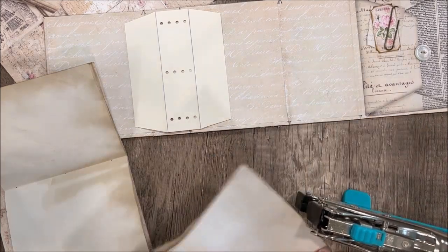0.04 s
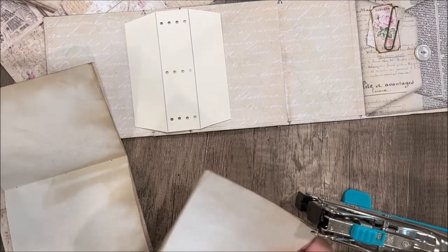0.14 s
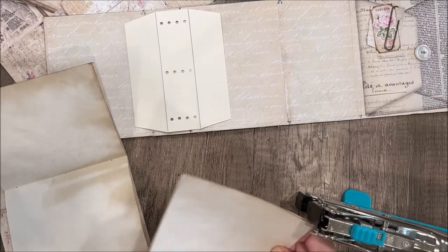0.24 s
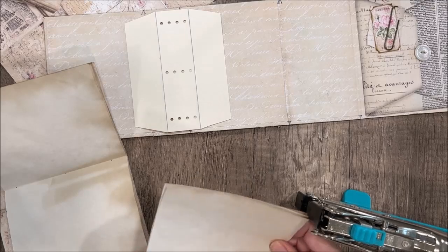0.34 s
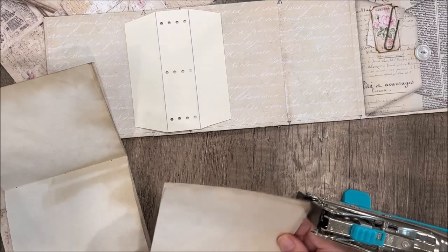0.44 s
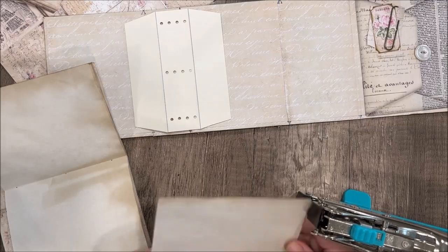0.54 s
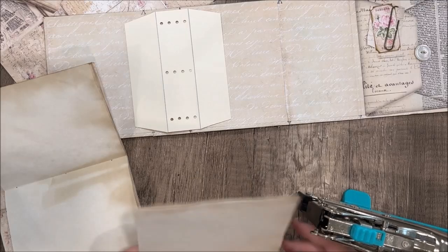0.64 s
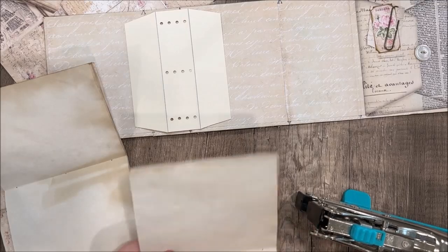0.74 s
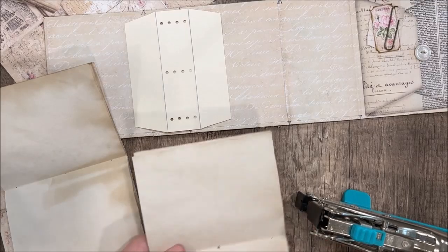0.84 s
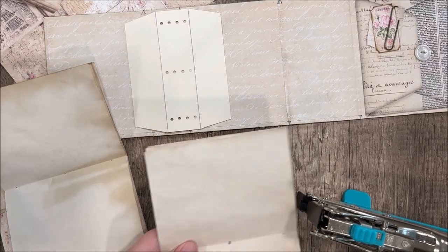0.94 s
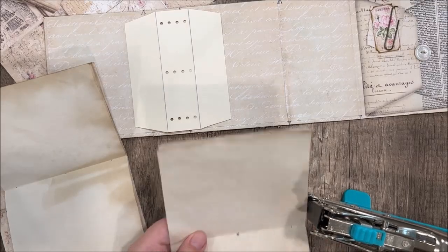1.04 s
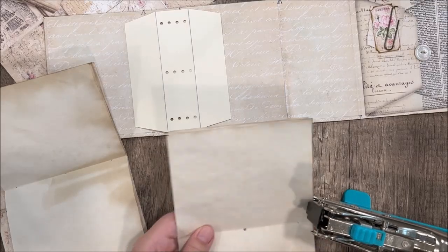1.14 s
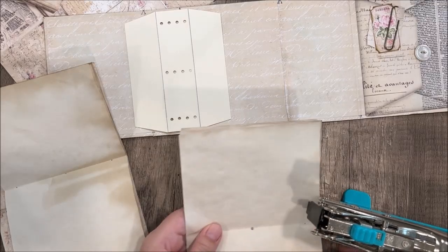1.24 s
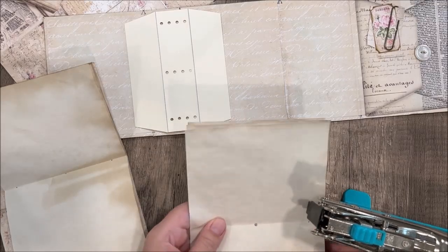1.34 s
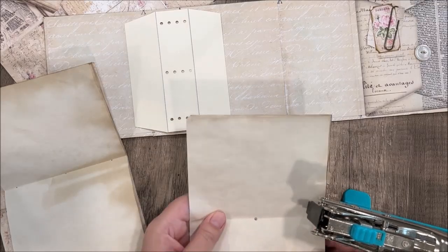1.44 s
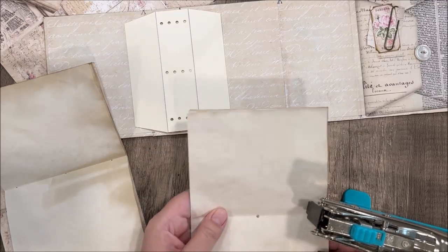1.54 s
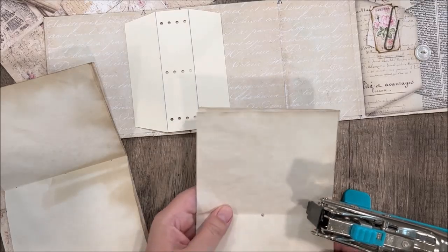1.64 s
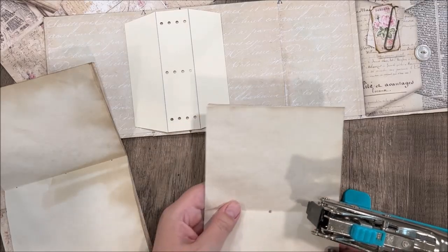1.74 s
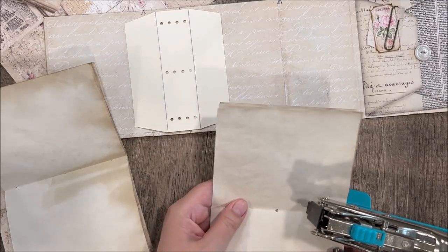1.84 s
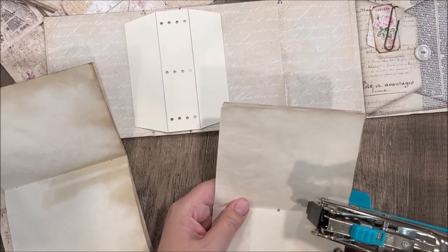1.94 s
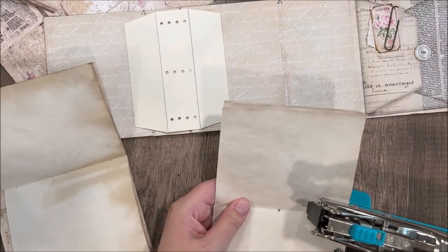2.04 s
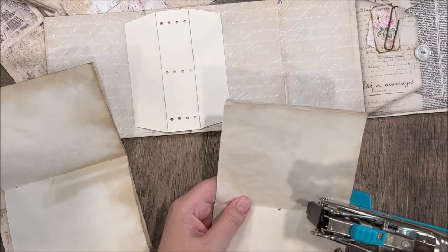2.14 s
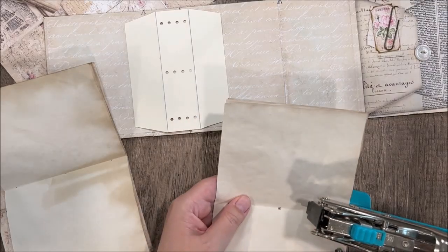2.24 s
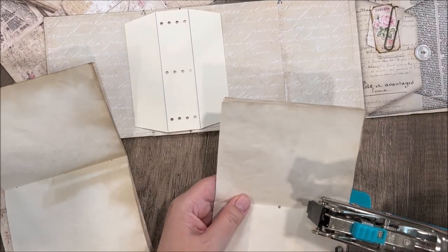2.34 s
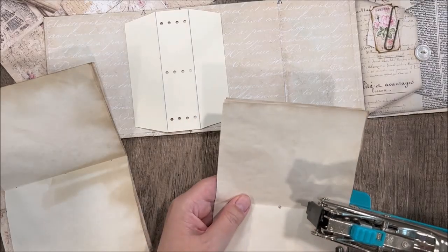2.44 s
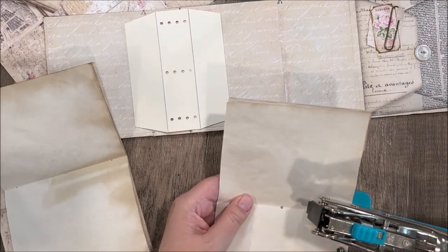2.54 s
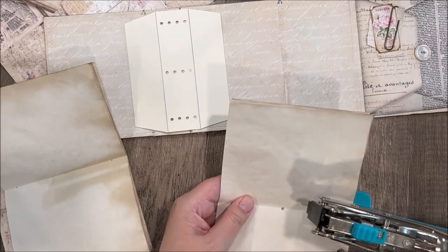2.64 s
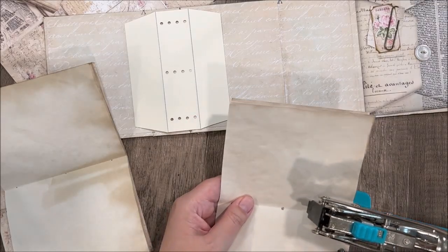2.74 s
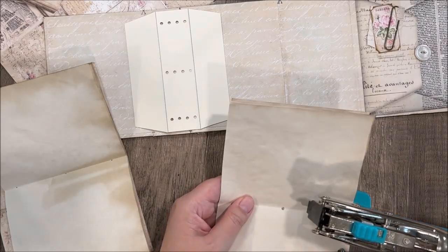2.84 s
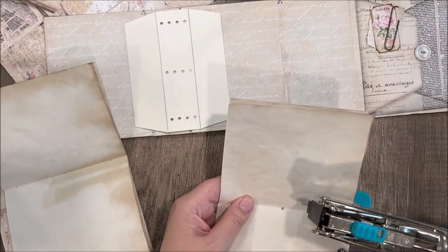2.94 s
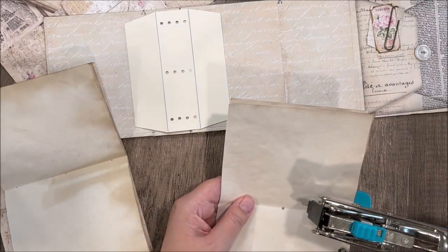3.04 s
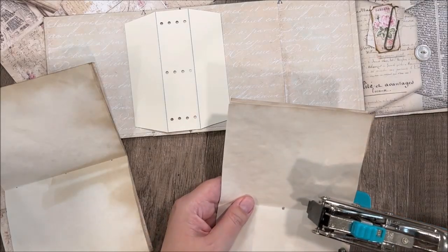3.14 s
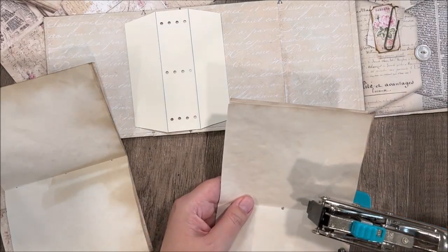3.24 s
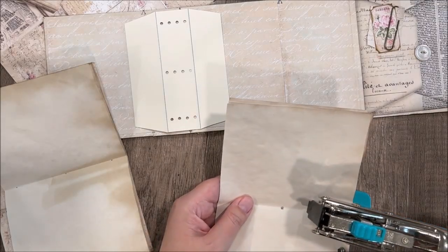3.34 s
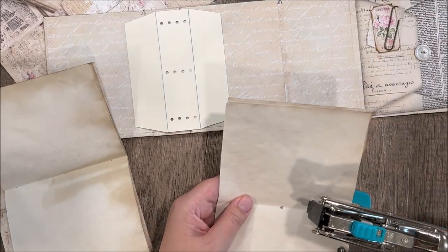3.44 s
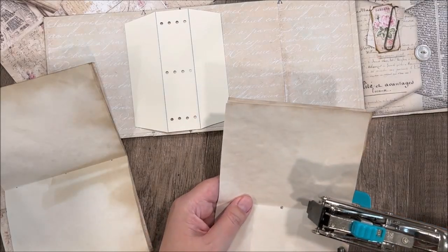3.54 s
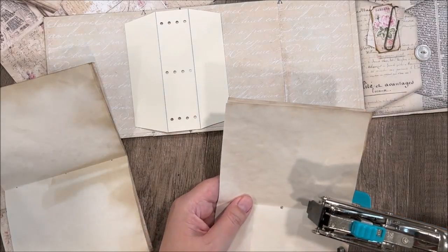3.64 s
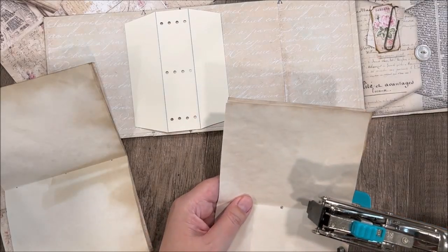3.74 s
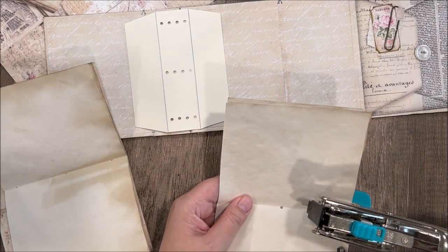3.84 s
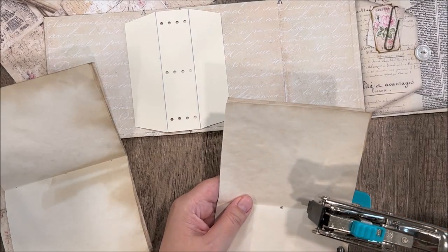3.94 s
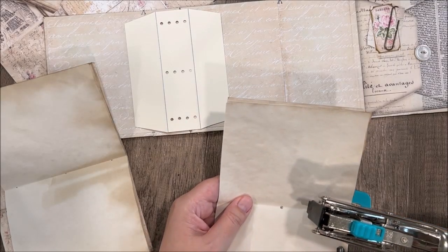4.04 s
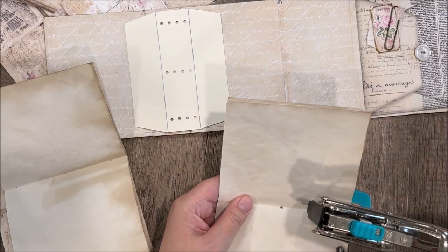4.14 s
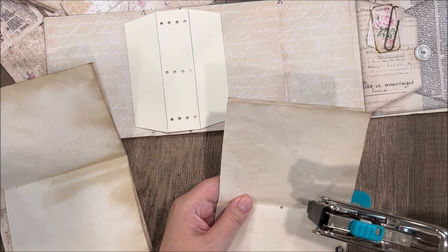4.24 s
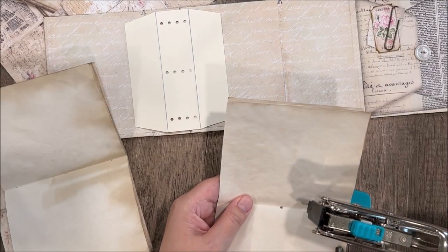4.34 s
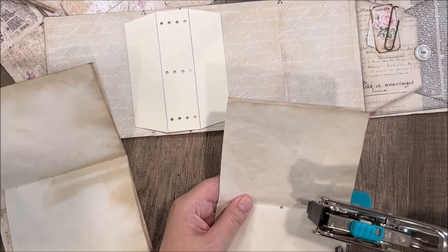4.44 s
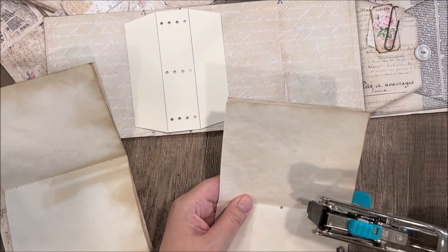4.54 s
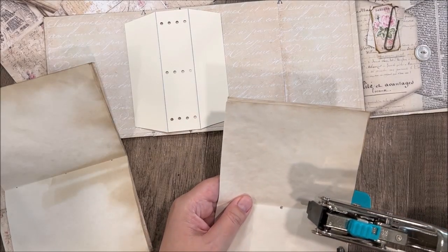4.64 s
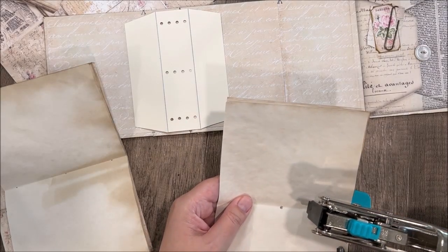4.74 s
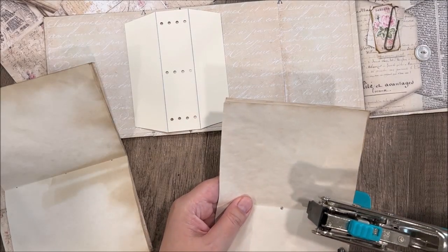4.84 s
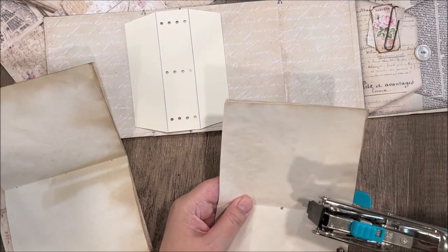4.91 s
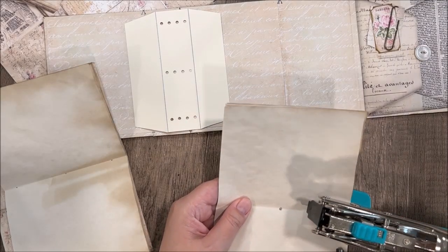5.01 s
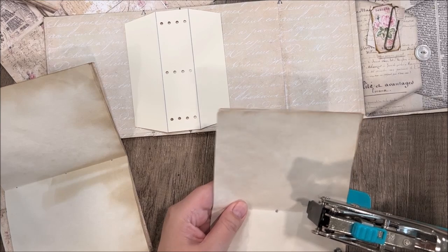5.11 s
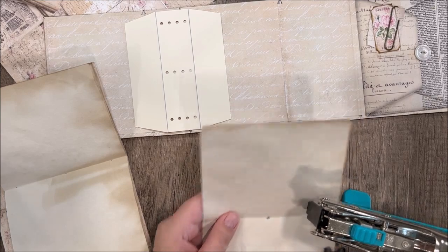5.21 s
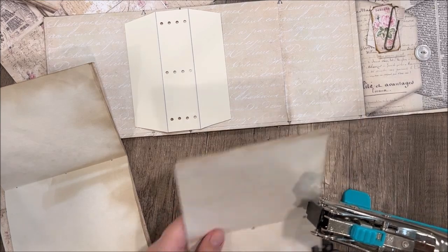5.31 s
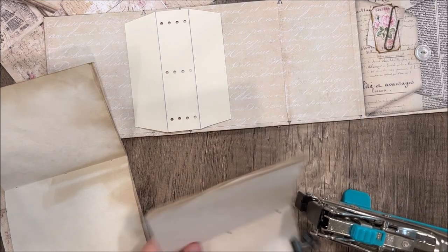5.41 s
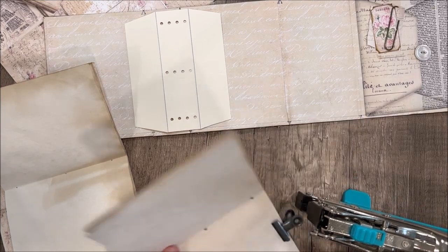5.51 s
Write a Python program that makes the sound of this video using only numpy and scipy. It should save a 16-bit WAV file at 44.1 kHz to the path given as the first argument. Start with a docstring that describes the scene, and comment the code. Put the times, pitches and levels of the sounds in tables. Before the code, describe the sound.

From the start, a folded sheet of paper slides and flexes in the hand, close to the microphone, with soft hiss and scattered little pops. The sharpest crinkle comes at about 1.2 seconds, with a faint squeak at 1.4 and lighter crackles until 1.9. It then goes quiet, apart from two light clicks and knocks of a steel hand punch on a wooden table around 2.7 to 2.8. At 4.4 the punch ticks and creaks faintly. At about 4.6 it bites through the paper with the loudest sound, a quick cluster of sharp, briefly ringing metal clacks and a papery scrape. It releases with clicks and thin, high squeaks near 4.95. The sheet tears free in a short crackle around 5.1, followed by soft table knocks and light rustling until 5.6. A faint low hum and dull rumble lie underneath, with short room reflections.

```python
"""A steel hand punch bites through folded paper over a wooden craft table, close under a phone's two mics.
Each blow cracks, rings the steel and thumps the table; rubbing makes hinge, spring and sheet squeak.
Just as near, the paper hisses as it slides, snaps as it buckles and tears free of the die.
Behind them are short room reflections, a soft low hum, a dull rumble and diffuse room noise."""
import sys
import numpy as np
from scipy import signal
from scipy.fft import rfft, irfft, next_fast_len
from scipy.io import wavfile

SR = 44100
rng = np.random.default_rng(int(sys.argv[2]) if len(sys.argv) > 2 else 0)


def output_pcm(signal):
    """Save a mono or channel-first signal as 16-bit PCM at the path in sys.argv[1].

    Samples are clipped to [-1, 1] before scaling.
    """
    pcm = np.clip(np.atleast_2d(signal).T, -1, 1) * 32767
    wavfile.write(sys.argv[1], SR, np.round(pcm).astype(np.int16))


N = 245637

# blows on the punch, close to the mics: (time [s], die level [dB], then relative to the die:
# jaws [dB], handles [dB], table [dB], crack of contact [dB])
BLOWS = [(2.6925, -58, -2, -8, -4.5, 9), (2.6970, -77.5, -5, 22, 10.5, 0), (2.7956, -70.5, -4, 22, 12, 7),
         (2.814, -62, -10, -8, 0, 19.5), (4.399, -42, -10.5, -8.5, -60.5, -5),
         (4.59, -42, -12.5, -15, 2.5, -2), (4.6304, -21, -9.5, -11.5, -35, -7),
         (4.6353, -13, -24, -27.5, -9.5, -5.5), (4.646, -29, -41, -26, 7, -10),
         (4.6582, -13.5, -16.5, -26, -21, -14), (4.6721, -26.5, -3.5, -13.5, -43.5, -16),
         (4.6790, -24, -11.5, -24, -12.5, -16), (4.698, -36, -11.5, -12, -6, -11),
         (4.9411, -44, -4.5, 3, -49, -8), (4.9498, -41.5, 1, -4.5, -5.5, -20),
         (4.9566, -34.5, -12, -18, -47, 1), (5.1371, -58.5, 13, 8, 17, -4),
         (5.1696, -58.5, 6, -13, 18.5, -8)]
PART_HZ = 12500, 7000, 1800, 150  # where die, jaws, handles and table sound
CONTACT_S, STEEL_ABOVE_HZ = .002, 500  # a blow builds over CONTACT_S
# modes of punch and table: (frequency [Hz])
MODE_HZ = [66, 138, 182, 359, 1034, 1099, 1161, 2650, 2815, 2930, 3060, 3180, 4030, 5050, 5652, 5760, 6800,
           6864, 6977, 7520, 7790, 8570, 10740, 11880, 12620, 12815, 12925, 12970, 13030, 15300]
# ring of each of those modes: (level [dB], t60 [s])
MODE_RINGS = [(-7.5, 0.21), (-1.5, 0.85), (-13.5, 0.14), (-4.5, 0.28), (-4, 0.14), (1.5, 0.11), (-1, 0.07),
              (-7.5, 0.1), (-11.5, 0.22), (-10.5, 0.24), (-5.5, 0.12), (3.5, 0.035), (-8, 0.071),
              (-4.5, 0.047), (-15.5, 0.21), (-8, 0.043), (-3.5, 0.1), (-28.5, 0.32), (-16, 0.052),
              (0, 0.04), (-1.5, 0.055), (-3, 0.033), (-16.5, .04), (-15, 0.032), (-25, .04), (1, 0.035),
              (2, 0.018), (-24, 0.34), (-15.5, 0.029), (-29, .025)]
# hinge, spring and sheet sing: (time [s], length [s], pitch [Hz], bandwidth [Hz], level [dB])
SQUEAKS = [(1.406, 0.048, 4390, 900, -64), (1.409, 0.028, 560, 50.4, -52), (1.415, 0.05, 388, 40, -59),
           (3.108, 0.15, 2850, 600, -83), (4.348, 0.043, 4760, 200, -67.5), (4.319, 0.11, 3200, 896, -71.5),
           (4.325, 0.18, 1104, 200, -69), (4.362, 0.045, 7800, 100, -60), (4.4, .16, 2850, 300, -70),
           (4.924, 0.017, 13100, 199, -55), (4.97, 0.061, 7000, 150, -52.5),
           (4.974, 0.047, 7460, 150, -53.5), (4.966, 0.18, 1096, 80, -61.5), (4.972, .04, 15000, 900, -49),
           (5.024, 0.1, 7990, 150, -45.5), (5.022, 0.035, 4860, 500, -55), (5.07, 0.038, 8000, 248, -52),
           (5.184, 0.058, 6220, 250, -63)]
# paper buckles: (time [s], pop level [dB], pitch [Hz], crisp edge relative to the pop [dB])
SNAPS = [(0.1441, -38, 810, -5), (0.1925, -39, 860, -17), (0.3608, -61, 960, 1), (0.8476, -46.5, 1250, -5),
         (0.956, -41.5, 1165, -17.5), (1.0477, -44, 985, -29), (1.1766, -29, 940, -28),
         (1.1894, -46, 947, -18), (1.2262, -26, 1305, 1), (1.2337, -27, 1087, 2), (1.2436, -53, 1070, -11),
         (1.411, -49.5, 740, -6), (1.6323, -39, 1030, -14), (1.727, -50.5, 1050, 2),
         (1.7406, -44.5, 980, -14), (1.756, -47, 1170, -8.6), (1.8305, -55, 987, -1),
         (1.8618, -46, 920, -3), (1.894, -45.5, 1120, -12), (4.6325, -19.5, 1270, -4.5),
         (4.9247, -40.5, 1150, -9.4), (5.0714, -29, 1000, -4), (5.082, -32.5, 1040, 4.5),
         (5.0944, -24.5, 1215, 0), (5.1083, -23, 1274, -22), (5.1207, -21.5, 1458, 1.5),
         (5.347, -57, 977, -7), (5.3577, -43.5, 1185, -12), (5.3934, -59, 940, 8.5),
         (5.4999, -40.5, 670, -10), (5.532, -53, 1593, 9)]
FLUTTER_DB, EDGE_FULLNESS = -19.5, 0.75  # fullness 0-1: how far down the edge reaches
# start and end of the tear: (time [s], pop level [dB], pitch [Hz])
TEAR, TEAR_POPS, TEAR_EDGE_DB = [(5.064, -41.5, 890), (5.102, -28, 1165)], 13, -11
# the sheet slides in the hand: (time [s], hiss [dB], airy top [dB], flexing body [dB])
SLIDE = [(0, -61, -65, -60), (.17, -68, -67, -64.5), (.34, -78.5, -97, -68), (.37, -63.5, -55.5, -64),
         (.6, -66.5, -55, -64), (.72, -78.5, -64, -67), (.76, -76, -77, -63), (.92, -83, -99, -69.5),
         (1.16, -99, -100, -81.5), (1.25, -66, -58, -58.5), (1.39, -75.5, -80, -69.5),
         (1.62, -85, -94.5, -67.5), (1.9, -79.5, -71, -69.5), (2.15, -94.5, -106, -77.5),
         (3.8, -93, -116, -82.5), (4.34, -82.5, -77, -88), (4.55, -77.5, -90, -79),
         (4.7, -55.5, -46, -51.5), (4.9, -68, -74.5, -79.5), (4.98, -59, -52, -61.5), (5.16, -62, -60, -62),
         (5.34, -74, -77, -66.5), (5.37, -74.5, -71, -61.5), (5.57, -74, -59, -69.5)]
# paper scuffs hand, table or steel: (time [s], hold [s], hiss [dB], airy top [dB], flexing body [dB])
SCUFFS = [(0.094, 0.063, -58, -56, -55.5), (0.187, 0.0077, -70, -74, -50), (0.357, 0.006, -69, -53.5, -63),
          (0.836, 0.017, -67, -69, -59.5), (1.174, 0.051, -88, -68, -51.5), (1.223, 0.0061, -54, -61, -40),
          (1.407, 0.011, -61.5, -79, -68), (1.622, 0.0045, -73, -62.5, -53.5),
          (1.723, 0.031, -65.5, -78, -59), (1.846, 0.054, -85, -87, -68), (2.466, 0.066, -95, -93, -72.5),
          (2.69, 0.0046, -66.5, -61, -67), (2.796, .008, -80, -82, -70), (2.8135, .004, -74, -62, -72),
          (4.198, 0.014, -80.5, -92, -72), (4.395, 0.005, -59.5, -54.5, -85), (4.5665, .02, -76, -64, -70),
          (4.5880, .035, -64, -54, -57), (4.6310, .055, -60, -38, -55), (4.9400, .01, -62, -52, -58),
          (4.9510, .009, -54, -42, -51), (5.06, 0.059, -65, -45, -42), (5.494, 0.017, -82, -73, -57.5)]
SCUFF_ATTACK_S, SCUFF_FADE_DB_PER_S = 0.0011, 454
# hiss of sliding paper: (frequency [Hz], relative level [dB])
HISS_SPECTRUM = [(900, -12.5), (1900, 3.5), (3200, 4.5), (4500, 3.5), (6000, -2.5), (7500, -7),
                 (10000, -34.5)]
# its airy top, heard close up: (frequency [Hz], relative level [dB])
AIR_SPECTRUM = [(4500, -23.5), (6500, -7), (8500, 2), (10500, -5), (13000, -1), (15800, -6.5)]
# the flexing body of the sheet: (frequency [Hz], relative level [dB])
FLEX_SPECTRUM = [(250, -6.5), (500, 1.5), (1100, 5.5), (1600, -0.5), (2300, -10.5), (4000, -15)]
# the low hum in the room wavers: (time [s], level [dB])
HUM_LEVELS = [(0.0, -55.5), (0.15, -53), (1.0, -54.5), (2.1, -61.5), (2.9, -55.5), (3.2, -54.5),
              (4.15, -57), (4.4, -58.5), (5.57, -55.5)]
HUM_HZ, ROOM_NOISE_DB = 77.6, -59
# a dull low rumble comes and goes; near 4.75 s, under the blows, the low sound swells again as the table rings:
# (time [s], level [dB])
RUMBLE_LEVELS = [(0.0, -60), (0.4, -60.5), (0.84, -65), (1.24, -63), (2.7, -70), (3.2, -90.5),
                 (4.48, -89.5), (4.75, -63), (5.1, -64.5), (5.57, -73.5)]
# colour of that rumble: (frequency [Hz], relative level [dB])
RUMBLE_SPECTRUM = [(100, -30.5), (170, -3.5), (205, 3), (228, -1.5), (252, 4.5), (280, -9.5), (420, -5.5),
                   (700, -38)]
# room noise all around the mics: (frequency [Hz], relative level [dB])
ROOM_SPECTRUM = [(20, -55), (32, -22.5), (45, -1), (60, -14), (110, -10.5), (200, -22), (400, -33),
                 (800, -38.5), (1110, -32), (1400, -42.5), (1900, -53.5), (3000, -56), (8000, -63),
                 (10500, -94.5), (12500, -47), (15000, -77)]
# decay of the room around the table: (frequency [Hz], t60 [s])
ROOM_DECAY = [(300, 0.41), (1200, 0.2), (4000, 0.36), (12000, 0.14)]
# stereo width of the mic pair: (frequency [Hz], share of the left-right difference kept [0-1])
MIC_WIDTH = [(60, 0.079), (200, 0.31), (600, 0.97), (6000, 1.0), (7500, 1), (9300, 0.21), (10600, 0.2),
             (12000, 0.14), (15000, 0.15)]
# balance of the pair: (frequency [Hz], left minus right [dB])
MIC_BALANCE = [(60, 0), (400, -1), (1300, -2.5), (2500, -3), (5500, -6), (7500, -1.5), (9500, 0)]
# phase between the mic ports: (frequency [Hz], left lead [rad])
MIC_LEAD = [(0, 0), (3600, -2.6), (4600, -4.6), (7000, -6.3), (9400, -3.14), (11850, 0), (14250, 3.14),
            (16700, 6.3)]
MIC_CUTOFF_HZ = 15850


def punch():
    """Close up, a blow rings each mode by how hard it reaches it; loose parts rattle, contact cracks."""
    out, t = np.zeros((2, N)), np.arange(3000) / SR
    noises = rng.standard_normal((len(BLOWS), 3, len(t)))
    scatters = rng.random((len(BLOWS), len(MODE_HZ), 2))
    drives = np.zeros((len(MODE_HZ), 2, N))
    crack_shape = np.minimum(t / CONTACT_S, 1) * (decay(t, 0.011) + 0.29 * decay(t, 0.018))
    for (s, db, *parts_db, crack_db), (shared, left, right), scatter in zip(BLOWS, noises, scatters):
        grit = np.array([shared + .5 * left, shared + .5 * right])
        rattle = grit * amp(-41) * decay(t, 0.029)
        reach_db = db + at_hz(list(zip(PART_HZ, [0] + parts_db))[::-1], np.array(MODE_HZ))
        for hz, drive, mode_db, (lateness, force) in zip(MODE_HZ, drives, reach_db, scatter):
            is_steel = hz > STEEL_ABOVE_HZ  # the table thumps at once, with no rattle
            gain = amp(mode_db + 1.33 * (force - 2.5))
            add(drive.T, s + lateness * CONTACT_S * is_steel, gain * np.ones((1, 2)))
            add(drive.T, s, gain * is_steel * rattle.T)
        add(out.T, s, (amp(db + crack_db) * crack_shape * grit).T)
    for hz, (db, t60), drive in zip(MODE_HZ, MODE_RINGS, drives):
        r, w = decay(1 / SR, t60), 2 * np.pi * hz / SR
        out += amp(db) * signal.lfilter([0, np.sin(w)], [1, -2 * r * np.cos(w), r * r], drive)
    return out


def squeaks():
    """Rubbing keeps one mode of hinge, spring or sheet singing, quick to start and slower to fade."""
    out = np.zeros(N)
    for s, length, hz, width, db in SQUEAKS:
        progress = np.arange(round(length * SR)) / (length * SR)
        swell = np.sin(np.pi * progress ** 0.5)
        add(out, s, amp(db) * wavering_tone(9000, hz, width)[:len(swell)] * swell)
    return out


def snaps():
    """Paper buckles under the mics: a pop of a couple of cycles, a flutter and a crisp edge of noise."""
    out, t, buckles = np.zeros(N), np.arange(3000) / SR, SNAPS + tear()
    for (s, db, hz, edge_db), noise in zip(buckles, rng.standard_normal((len(buckles), len(t)))):
        swing = np.exp(-((hz * t - .7) / .65) ** 2)
        pop = np.sin(2 * np.pi * hz * t) * (swing + amp(FLUTTER_DB) * decay(t, 0.085))
        edge = unit_rms(signal.lfilter([1, 0, -1], [1, -EDGE_FULLNESS], noise))
        edge *= decay(t, 0.0047) + 0.06 * decay(t, 0.035)
        add(out, s, amp(db) * (pop + amp(edge_db) * edge))
    return out


def tear():
    """The sheet tears free of the die: rows of unevenly spaced buckles, growing louder and higher."""
    progress = (np.arange(TEAR_POPS) + rng.random(TEAR_POPS)) / TEAR_POPS
    first, last = np.array(TEAR)
    return [(*(first + (last - first) * share), TEAR_EDGE_DB) for share in progress]


def rustle():
    """Fibres slip quickly as the sheet slides; its body flexes in sparser, lower crackles."""
    hiss, air, body = handling()
    slips = fibre_slips(per_s=11000, spread_db=4.5, alike=0.58)
    flex = coloured(fibre_slips(per_s=1200, spread_db=2.0, alike=.75), FLEX_SPECTRUM)
    return hiss * coloured(slips, HISS_SPECTRUM) + air * coloured(slips, AIR_SPECTRUM) + body * flex


def handling():
    """Gains of hiss, airy top and body: the slow slide plus scuffs that start at once, hold and fade."""
    power, t = amp(curves(SLIDE)) ** 2, np.arange(9000) / SR
    for s, hold, *levels_db in SCUFFS:
        shape = np.minimum(t / SCUFF_ATTACK_S, 1) * amp(-SCUFF_FADE_DB_PER_S * np.maximum(t - hold, 0))
        add(power.T, s, np.outer(shape, amp(levels_db)) ** 2)
    return np.sqrt(power)


def fibre_slips(per_s, spread_db, alike):
    """Tiny slips of uneven size reach both mics, over a steady noise that differs at each."""
    size = amp(spread_db * np.minimum(rng.exponential(1, N), 5)) * (rng.random(N) < per_s / SR)
    shared, own = rng.standard_normal(N), rng.standard_normal((2, N))
    return size * alike * shared + np.sqrt(np.mean(size ** 2) * (1 - alike ** 2)) * own


def reflections(x):
    """The room returns sparse echoes, different at each mic, each band dying at its own speed."""
    taps = np.zeros((2, SR // 2))
    arrivals = np.arange(100, SR // 2 - 20, 20) + rng.integers(0, 20, (2, (SR // 2 - 101) // 20))
    np.put_along_axis(taps, arrivals, rng.choice([-1., 1.], arrivals.shape), 1)
    hz, t, bands = signal.stft(taps, SR, nperseg=256)
    tail = signal.istft(bands * decay(t, at_hz(ROOM_DECAY, hz)[:, None]), SR, nperseg=256)[1]
    return signal.fftconvolve(x[None], tail / np.linalg.norm(tail[0]), axes=1)[:, :N]


def room_tone():
    """Behind the table: diffuse noise, a dull rumble and a wavering hum."""
    noise = amp(ROOM_NOISE_DB) * coloured(rng.standard_normal((2, N)), ROOM_SPECTRUM)
    rumble = amp(curves(RUMBLE_LEVELS)[0]) * coloured(rng.standard_normal((2, N)), RUMBLE_SPECTRUM)
    hum = np.sin(2 * np.pi * HUM_HZ * np.arange(N) / SR) + .5 * wavering_tone(N, HUM_HZ, width_hz=26)
    return noise + rumble + amp(curves(HUM_LEVELS)[0]) * hum


def wavering_tone(count, hz, width_hz):
    """Narrow noise around hz, at rms 1."""
    pole = np.exp(-np.pi * width_hz / SR)
    drift = rng.standard_normal(count) + 1j * rng.standard_normal(count)
    drift = signal.lfilter([1], [1, -pole], signal.lfilter([1], [1, -pole], drift))
    return unit_rms((drift * np.exp(2j * np.pi * hz * np.arange(count) / SR)).real)


def coloured(x, spectrum):
    """Filters x by a spectrum, at rms 1."""
    size = next_fast_len(N)
    gain = amp(at_hz(spectrum, np.fft.rfftfreq(size, 1 / SR)))
    return unit_rms(irfft(rfft(x, size) * gain, size)[..., :N])


def amp(db):
    return 10 ** (np.asarray(db) / 20)


def decay(t, t60):
    return amp(-60 * t / t60)


def unit_rms(x):
    return x / np.sqrt(np.mean(x ** 2) + 1e-20)


def at_hz(points, hz):
    """Reads a table along log frequency."""
    knots_hz, values = np.transpose(points)
    return np.interp(np.log(hz + 1), np.log(knots_hz + 1), values)


def curves(rows):
    """Draws each column of a timed table out to every sample."""
    times, *columns = np.transpose(rows)
    return [np.interp(np.arange(N) / SR, times, column) for column in columns]


def add(mix, s, sound):
    part = mix[round(s * SR):][:len(sound)]
    part += sound[:len(part)]


def scene():
    """Punch and paper close to the mics, with the room behind them."""
    paper, blows, squeaking = snaps(), punch(), squeaks()
    reflected = reflections(amp(-10.0) * paper + amp(-5.5) * (blows.mean(0) + squeaking))
    return blows + squeaking + paper + rustle() + reflected + room_tone()


def record(dry):
    """The phone's mic pair narrows bass and high treble; its ports differ in level and phase."""
    size = next_fast_len(N + 512)
    hz = np.fft.rfftfreq(size, 1 / SR)
    left, right = rfft(dry, size)
    mid = (left + right) / 2
    side = (left - right) / 2 * at_hz(MIC_WIDTH, hz)
    port = amp(at_hz(MIC_BALANCE, hz) / 2) * np.exp(.5j * np.interp(hz, *np.transpose(MIC_LEAD)))
    pair = irfft(np.array([(mid + side) * port, (mid - side) / port]), size)[:, :N]
    lowpass = signal.firwin(511, MIC_CUTOFF_HZ, window=("kaiser", 9), fs=SR)
    return signal.oaconvolve(pair, lowpass[None], "same")


dry = scene()
out = record(dry)
output_pcm(out)
```